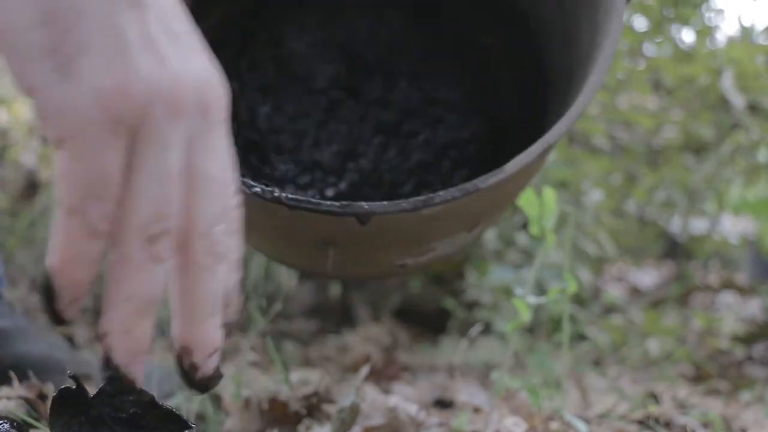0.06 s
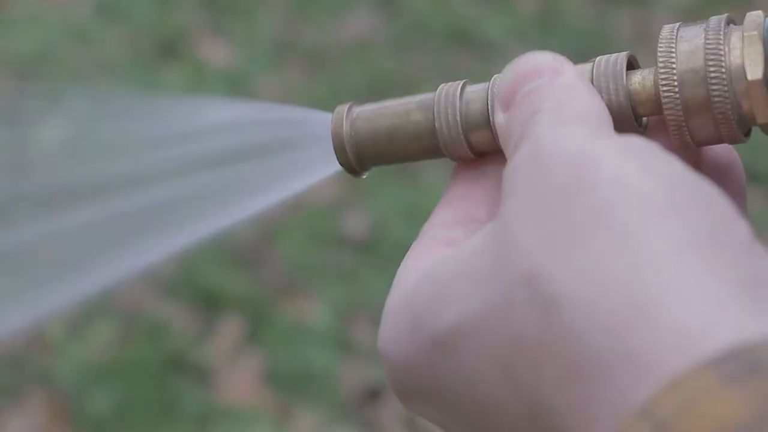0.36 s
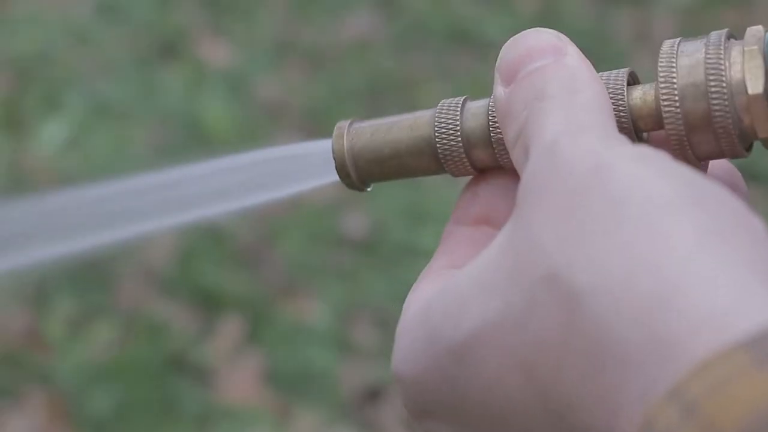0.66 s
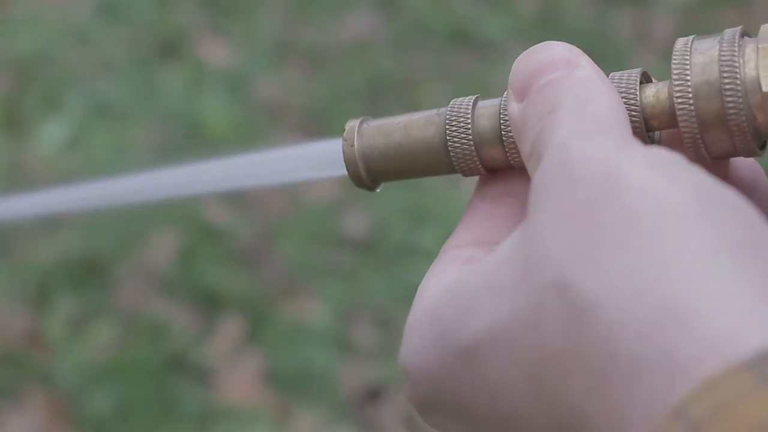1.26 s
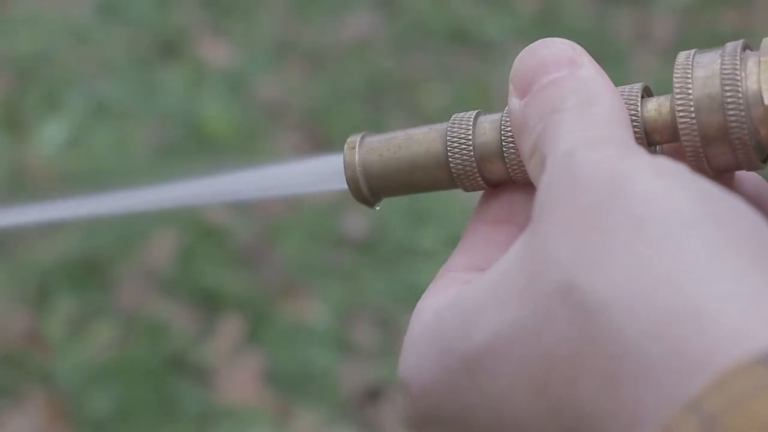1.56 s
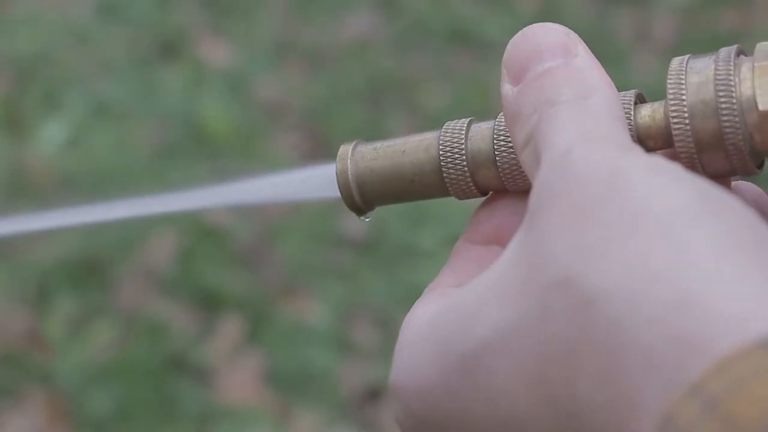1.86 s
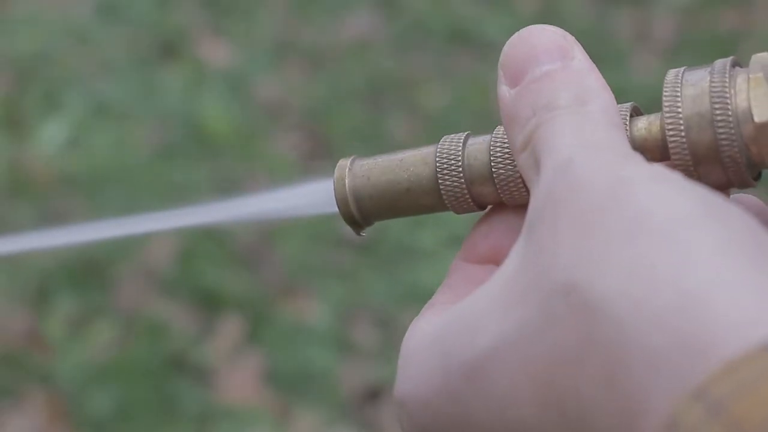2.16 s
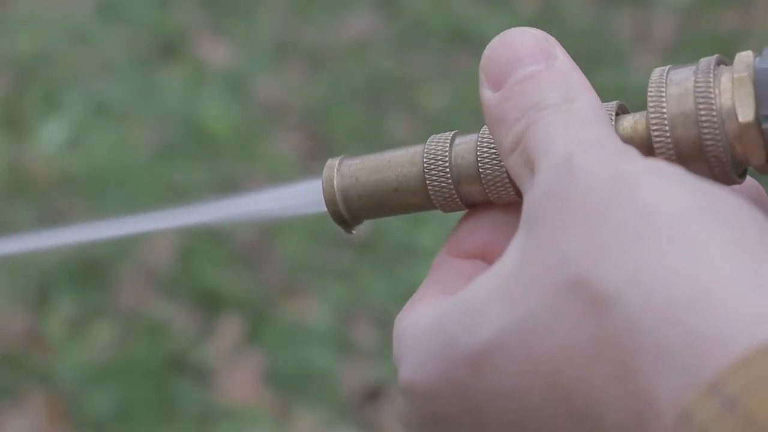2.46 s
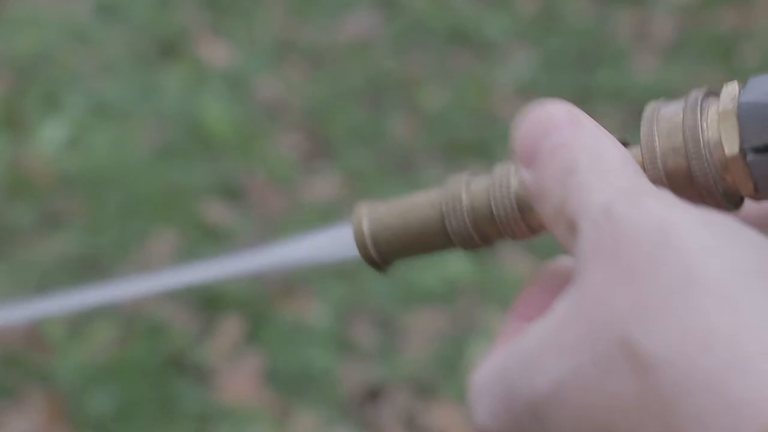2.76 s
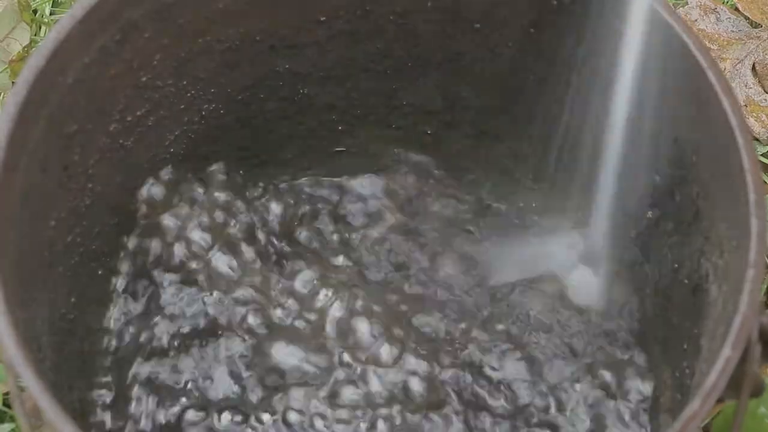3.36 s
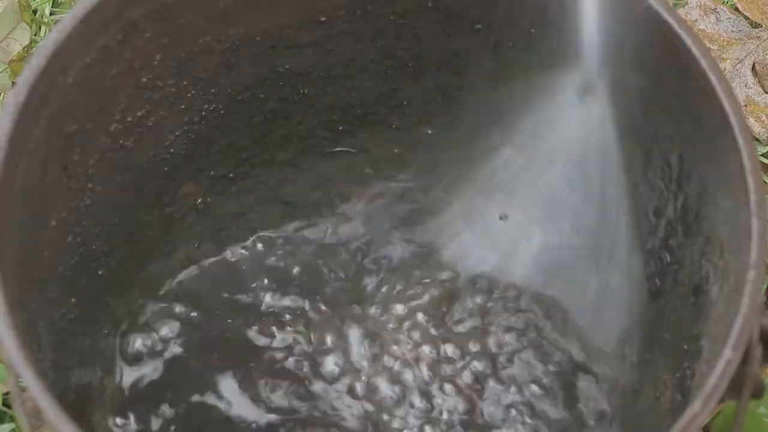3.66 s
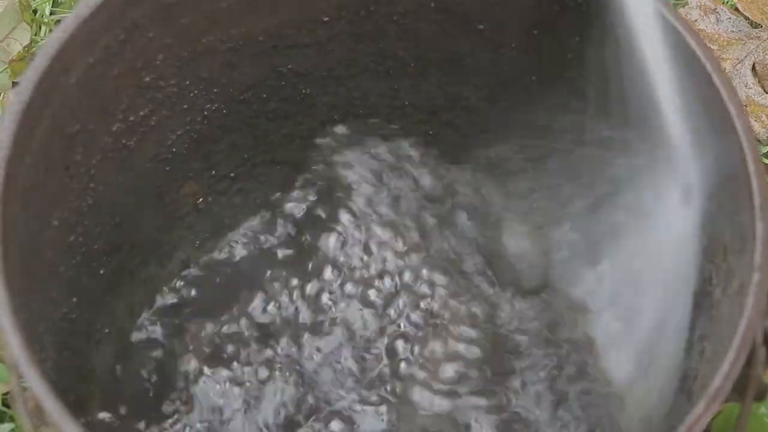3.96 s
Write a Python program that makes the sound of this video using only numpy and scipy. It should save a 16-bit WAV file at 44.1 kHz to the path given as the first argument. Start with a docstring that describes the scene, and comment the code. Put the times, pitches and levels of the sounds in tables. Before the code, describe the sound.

Water hisses from a garden hose nozzle outdoors and patters on grass and dead leaves, after a moment of wind on the microphone. The jet then plunges into a part-filled metal pot, fizzing and gurgling with short ringing tones.

```python
"""Garden hose on grass and into a pot

Wind buffets the microphone and a hand flicks a little water. Then a brass nozzle hisses, its fan
narrowing to a jet, while drops patter on grass and dead leaves. At last the jet plunges into a
part-filled metal pot: a bright fizzing rush, gurgling bubbles and short ringing tones. All in mono."""
import sys
import numpy as np
from scipy import signal
from scipy.io import wavfile

SR = 44100
rng = np.random.default_rng(int(sys.argv[2]) if len(sys.argv) > 2 else 0)


def waveform_to_disk(signal):
    """Save audio, clipped to [-1, 1], as 16-bit WAV at the path in sys.argv[1]."""
    frames = np.transpose(np.atleast_2d(signal))
    scaled = np.clip(frames, -1, 1) * 32767
    samples = np.round(scaled).astype(np.int16)
    wavfile.write(sys.argv[1], SR, samples)


N = 176400
TIME = np.arange(N) / SR
SPRAY_ON_S, LAWN_OFF_S, POT_S = 0.4075, 3.14, 3.143  # the spray starts, leaves the lawn, meets the pot
FAN_UNTIL_S, JET_FROM_S = 1.0, 1.66


def spray():
    """Water lands on the lawn in clumps of drops, coarser as the fan narrows to a jet."""
    narrow = np.clip((TIME - FAN_UNTIL_S) / (JET_FROM_S - FAN_UNTIL_S), 0, 1)
    clumps = rms_one(from_db((0.92 + narrow) * drift(140)))
    drops = blend(impacts(6000, 2.1), impacts(4000, 2.0), narrow)
    water = clumps * (lawn(drops) + hollow()) + nozzle(drops, narrow) + mist()
    return water * fade_in(SPRAY_ON_S, 0.0022) * (1 - fade_in(LAWN_OFF_S, 0.014))


# How loud the bright patter and the dull thud are: (time [s], level [dB])
PATTER_LEVEL = [(.42, -42.5), (.84, -41.5), (.91, -39), (1.08, -41), (1.47, -42), (1.58, -45),
                (1.97, -45.5), (2.03, -43), (2.18, -45.5), (2.28, -42.5), (2.62, -43), (2.68, -45),
                (2.875, -42), (2.93, -53), (2.955, -49.5), (3.13, -43)]
THUD_LEVEL = [(.42, -49.5), (.6, -53.5), (1.22, -53), (1.34, -49), (1.6, -57.5), (2.3, -54.5),
              (3.13, -59.5)]
# Their tone, from low to high: (frequency [Hz], relative level [dB])
PATTER_TONE = [(800, -11), (1150, -1), (1450, -4), (1900, -2), (2270, 0.5), (2800, -.5), (3650, 3.5),
               (4100, -0.5), (4700, -3.5), (5600, -7.5)]
THUD_TONE = [(40, -11.5), (190, -7), (450, -1), (900, -2.5)]

def lawn(drops):
    """The same drops patter and thud on grass and leaves."""
    patter = bands(PATTER_TONE, count=17, patchy_db=1.0, flicker=9.8, clicks=drops, grain=0.41)
    thud = bands(THUD_TONE, count=11, patchy_db=1.4, clicks=drops, grain=0.82)
    return level(PATTER_LEVEL) * patter + level(THUD_LEVEL) * thud


# How loud each part of the rush in the pot is: (time [s], level [dB])
FIZZ_LEVEL = [(3.14, -41), (3.38, -42), (3.46, -39.5), (3.55, -41.5), (3.73, -42.5), (3.85, -38.5),
              (4, -41)]
FROTH_LEVEL = [(3.2, -57), (3.38, -60), (3.47, -47.5), (3.68, -55), (3.9, -49.5), (4, -56)]
CHURN_LEVEL = [(3.15, -41.5), (3.3, -37), (3.38, -41), (3.53, -37.5), (3.62, -41), (4, -40)]
SLOSH_LEVEL = [(3.17, -65.5), (3.3, -48), (3.38, -53.5), (4, -53)]
# The tone of each part: (frequency [Hz], relative level [dB])
FIZZ_TONE = [(3600, 1), (4600, -3), (8500, -6), (13000, -16), (15800, -26)]
FROTH_TONE = [(10000, -2), (12500, 2), (15800, -8)]
CHURN_TONE = [(850, -4), (3300, 5.5), (4000, -0.5)]
SLOSH_TONE = [(200, -12.5), (300, -2), (430, 3), (620, -9), (850, -0.5)]
DRONE_TONE = [(25, -9), (90, -1), (150, -8), (220, -15)]

def pot():
    """The jet tears the water into fizz and froth, churns and sloshes it, and makes the pot drone."""
    bursts = impacts(2300, 1.5)
    fizz = bands(FIZZ_TONE, count=10, patchy_db=1.0, flicker=40, clicks=bursts, grain=0.55)
    froth = bands(FROTH_TONE, count=5, patchy_db=0, clicks=bursts, grain=0.45)
    churn = bands(CHURN_TONE, count=13, patchy_db=1.5, flicker=40, clicks=impacts(1200, 2.4), grain=0.55)
    slosh = bands(SLOSH_TONE, count=9, patchy_db=4, flicker=18)
    drone = bands(DRONE_TONE, count=8, patchy_db=3)
    highs = level(FIZZ_LEVEL) * fizz + level(FROTH_LEVEL) * froth
    body = level(CHURN_LEVEL) * churn + level(SLOSH_LEVEL) * slosh + from_db(-61) * drone
    return (highs + body) * fade_in(POT_S, 0.0026)


# Tones in the pot: (peak time [s], pitch [Hz], level [dB], rise [s], fall [s], roughness [0-1])
POT_RINGS = [(3.144, 2887, -36, 0.0014, 0.065, 0.4), (3.147, 3530, -37.5, .002, 0.036, 0.4),
             (3.247, 3245, -34, 0.0089, 0.015, 0.4), (3.32, 2170, -41, 0.021, 0.029, 0.46),
             (3.43, 2467, -38, 0.012, 0.014, 0.3), (3.456, 3060, -26, 0.0066, .007, 0.56),
             (3.469, 3070, -28.5, 0.0022, .005, 0.3), (3.483, 3080, -32.5, 0.0022, .005, 0.4),
             (3.52, 3080, -35, 0.012, 0.02, 0.9), (3.594, 3110, -34.5, 0.0034, 0.01, 0.5),
             (3.64, 2505, -35, 0.022, 0.066, 0.14), (3.86, 2898, -41, 0.12, 0.04, 0.56),
             (3.914, 2906, -28.5, 0.015, 0.042, 0.33), (3.912, 2470, -26, 0.018, 0.014, 0.3),
             (3.96, 2500, -31.5, 0.018, 0.027, 0.36), (3.998, 2450, -32, 0.0081, .03, 0.3)]

def rings():
    """Clear tones swell and die in the pot, fluttering as the jet keeps shaking them."""
    wander_hz, flutter_per_s = 12, 100
    out = np.zeros(N)
    for peak_s, hz, db, rise, fall, rough in POT_RINGS:
        t = TIME - peak_s
        envelope = np.exp(-np.where(t < 0, (t / rise) ** 2 / 2, t / fall))
        phase = 2 * np.pi * np.cumsum(hz + wander_hz * drift(7.97)) / SR
        shaken = np.sin(phase) + rough * breathy(phase, flutter_per_s)
        out += from_db(db) * envelope * shaken * np.sqrt(2 / (1 + 2 * rough ** 2))
    return out


# Large bubbles in the pot: (time [s], level [dB], starting pitch [Hz])
BUBBLES = [(3.305, -35.5, 427), (3.308, -29, 1440), (3.412, -33.5, 960), (3.527, -25.5, 1270),
           (3.544, -26, 1780), (3.564, -29, 1450), (3.657, -32.5, 946), (3.676, -24, 2210)]

def bubbles():
    """Large bubbles ring briefly and rise in pitch."""
    ring_cycles, pitch_rise, attack_s = 31, 0.041, 0.0009
    out = np.zeros(N)
    for start, db, hz in BUBBLES:
        t = np.maximum(TIME - start, 0)
        age = np.minimum(t * hz / ring_cycles, 2)  # at 1 the ring has faded by 60 dB
        envelope = from_db(db - 60 * age) * (1 - np.exp(-t / attack_s))
        out += envelope * np.sin(2 * np.pi * hz * t * (1 + pitch_rise * age))
    return out


# How dead leaves ring when hit: (pitch [Hz], filter width [Hz], relative level [dB])
LEAF_RESONANCES = [(2300, 400, -0.92), (3800, 1040, -0.1)]
# The strongest clumps of drops: (time [s], level [dB])
SPURTS = [(2.2365, -33), (2.3184, -39), (2.3727, -33.5), (2.472, -35), (2.747, -39), (2.876, -31),
          (2.9494, -36), (3.0362, -46)]

def leaf_taps():
    """The narrow jet throws larger drops that tap on dead leaves, now and then in a clump."""
    taps = from_db(-6) * level(PATTER_LEVEL) * resonances(impacts(330, 2.2), LEAF_RESONANCES)
    taps *= fade_in(JET_FROM_S, 0.22) * (1 - fade_in(LAWN_OFF_S, .01))
    attack_s, fall_s = 0.0005, 0.0036
    clumps = np.zeros(N)
    for start, db in SPURTS:
        t = np.maximum(TIME - start, 0)
        clumps += from_db(db) * (1 - decay(t, attack_s)) * decay(t, fall_s)
    splat = bands(PATTER_TONE, count=9, patchy_db=1.5, clicks=impacts(3000, 1.7), grain=0.7)
    return taps + clumps * splat


# Single drops: (time [s], level [dB], pitch [Hz], ring length [cycles], tick relative to ring [dB])
HEAVY_DROPS = [(.1611, -29, 3000, 24, -1), (.1612, -31, 1250, 12, -12), (.1806, -28.5, 5700, 50, -3),
               (3.1255, -28, 4300, 14, -1), (3.453, -17.5, 3050, 26, -11)]

def heavy_drops():
    """Each heavy drop is a sharp tick of noise and a short ring."""
    tick_band = signal.butter(1, [1100, 5000], "band", fs=SR, output="sos")
    out = np.zeros(N)
    for start, db, hz, cycles, tick_db in HEAVY_DROPS:
        t = np.maximum(TIME - start, 0)
        ring = from_db(-60 * np.minimum(t * hz / cycles, 2)) * np.sin(2 * np.pi * hz * t)
        noise = rms_one(signal.sosfilt(tick_band, rng.standard_normal(N)))
        tick = from_db(tick_db) * decay(t, fall_s=.0008) * noise
        out += (t > 0) * from_db(db) * (ring + tick)
    return out


# How loud the drumming in the soil is: (time [s], level [dB])
HOLLOW_LEVEL = [(1.3, -56), (1.405, -40), (1.52, -44), (1.62, -53), (1.82, -47.5), (1.94, -50),
                (2.08, -55.5)]
# How the hollow rings: (pitch [Hz], filter width [Hz], relative level [dB])
HOLLOW_RESONANCES = [(1123, 330, 4), (2180, 560, -4.5)]

def hollow():
    """The jet drums a hollow in the wet soil with sputtering slaps."""
    sputter = from_db(3.5 * drift(40))
    return passing(HOLLOW_LEVEL) * resonances(sputter * impacts(1500, 0.99), HOLLOW_RESONANCES)


# The sinking note: (time [s], pitch [Hz])
GLIDE_PITCH = [(1.25, 2514), (1.42, 2147.5)]
# How loud it is: (time [s], level [dB])
GLIDE_LEVEL = [(1.22, -56), (1.31, -51), (1.4, -44), (1.44, -58)]

def hollow_glide():
    """A breathy note sinks in pitch as the fan closes into a jet."""
    phase = 2 * np.pi * np.cumsum(np.interp(TIME, *np.transpose(GLIDE_PITCH))) / SR
    return passing(GLIDE_LEVEL) * breathy(phase, flutter_per_s=130)


# How loud the swinging jet is: (time [s], level [dB])
SWEEP_LEVEL = [(2.89, -56), (3.07, -43), (3.128, -43), (3.145, -49)]
# Its tone: (frequency [Hz], relative level [dB])
SWEEP_TONE = [(2800, -3), (7200, -0.5), (11000, -14), (14000, -24)]

def sweep():
    """The jet swings across the leaves towards the pot, and its sizzle swells."""
    sizzle = bands(SWEEP_TONE, count=9, patchy_db=2.0, flicker=28, clicks=impacts(1500, 2.5), grain=.55)
    return passing(SWEEP_LEVEL) * sizzle


# How loud the nozzle is: (time [s], level [dB])
HISS_LEVEL = [(.42, -54), (1.35, -53), (1.55, -55), (2.1, -49), (3.12, -54)]
# Its tone as a fan and as a jet: (frequency [Hz], relative level [dB])
FAN_TONE = [(5500, -3.5), (7500, -11.5), (11000, -17)]
JET_TONE = [(5500, -3.5), (7200, -3.5), (8700, -12), (9600, -9.5), (11000, -11.5)]

def nozzle(drops, narrow):
    """The nozzle hisses, brighter and grainier as the fan becomes a jet."""
    fan = bands(FAN_TONE, count=5, patchy_db=1.5, clicks=drops, grain=.3)
    jet = bands(JET_TONE, count=12, patchy_db=1.7, clicks=drops, grain=0.49)
    return level(HISS_LEVEL) * blend(fan, jet, narrow)


# How loud the mist is: (time [s], level [dB])
MIST_LEVEL = [(.42, -59), (1.58, -61), (1.92, -54.5), (2.2, -53.5), (3.13, -59)]
# Its tone: (frequency [Hz], relative level [dB])
MIST_TONE = [(11000, -1), (12600, 3.5), (14200, 1.5), (15800, -2)]

def mist():
    """The finest droplets of the spray make a very high sizzle."""
    sizzle = bands(MIST_TONE, count=4, patchy_db=1.6, flicker=29, clicks=impacts(4000, 2.4), grain=0.71)
    return level(MIST_LEVEL) * sizzle


# How loud the wind and the flicked water are: (time [s], level [dB])
WIND_LEVEL = [(0, -45.5), (.2, -45), (.27, -43), (.4, -43.5)]
FLICK_LEVEL = [(.14, -75), (.152, -50), (.17, -41), (.189, -57), (.208, -54), (.235, -70)]
# The tone of wind, garden rustle and flick: (frequency [Hz], relative level [dB])
WIND_TONE = [(20, -10), (85, -3), (130, -13.5), (190, -12.5), (250, -28), (400, -38)]
RUSTLE_TONE = [(300, -12), (480, -17.5), (1300, -21), (3500, -18), (6100, -31), (15500, -43)]
FLICK_TONE = [(300, -19), (1100, 0.5), (2060, -4), (3400, 2), (5000, -5), (10100, -13), (15500, -36)]

def wind_and_flick():
    """Wind on the microphone, a faint rustle and a flick of water, until the spray takes over."""
    wind = bands(WIND_TONE, count=8, patchy_db=2.5)
    rustle = bands(RUSTLE_TONE, count=14, patchy_db=1.0, clicks=impacts(600, 1.6), grain=0.18)
    flick = bands(FLICK_TONE, count=10, patchy_db=1.5, flicker=83, clicks=impacts(1500, 3.7), grain=0.43)
    mix = level(WIND_LEVEL) * wind + from_db(-55) * rustle + passing(FLICK_LEVEL) * flick
    return mix * (1 - fade_in(SPRAY_ON_S, 0.0045))


def hand_bump():
    """A soft, low bump as the hand shifts on the nozzle."""
    peak_s, width_s, hz = 0.638, 0.013, 118
    envelope = np.exp(-((TIME - peak_s) / width_s) ** 2 / 2)
    return from_db(-50) * envelope * np.sin(2 * np.pi * hz * TIME)


def from_db(db):
    """Turn decibels into a gain, the number to multiply a sound by."""
    return 10 ** (np.asarray(db) / 20)


def rms_one(x):
    """Scale a signal so its average strength (rms) is 1."""
    return x / np.sqrt(np.mean(x ** 2) + 1e-20)


def level(rows):
    """Gain over time from (time [s], level [dB]) rows."""
    return from_db(np.interp(TIME, *np.transpose(rows)))


def passing(rows):
    """Like level, but silent before the first row and after the last."""
    return level(rows) * (TIME > rows[0][0]) * (TIME < rows[-1][0])


def fade_in(at, length):
    """A ramp from 0 to 1 centred on a moment."""
    return np.clip((TIME - at) / length + .5, 0, 1)


def decay(t, fall_s):
    """Die away from 1 to almost nothing."""
    return np.exp(-np.minimum(t / fall_s, 20))


def blend(first, second, share):
    """Fade between two noises at even strength as share goes from 0 to 1."""
    return np.sqrt(1 - share) * first + np.sqrt(share) * second


def drift(rate):
    """A smooth random wobble of strength 1; a higher rate [Hz] wobbles faster."""
    step, warm_up = 40, 2000  # one random value every 40 samples
    r = np.exp(-2 * np.pi * step * rate / SR)
    noise = rng.standard_normal(N // step + warm_up + 2)
    slow = signal.lfilter([1], [1, -2 * r, r * r], noise)[warm_up:]
    return np.interp(np.arange(N) / step, np.arange(len(slow)), rms_one(slow))


def breathy(phase, flutter_per_s):
    """Noise gathered closely around one pitch."""
    return drift(flutter_per_s) * np.sin(phase) + drift(flutter_per_s) * np.cos(phase)


def impacts(per_s, spread_db):
    """Random clicks, many small and a few large."""
    sizes = from_db(spread_db * np.minimum(rng.exponential(1, N), 4.5))
    signs = np.sign(rng.random(N) - .5)
    hits = rng.random(N) < per_s / SR
    return rms_one(sizes * signs * hits)


def resonate(x, hz, width_hz):
    """A filter that rings at one pitch."""
    r = np.exp(-np.pi * width_hz / SR)
    feedback = [1, -2 * r * np.cos(2 * np.pi * hz / SR), r * r]
    return signal.lfilter(np.array([1, 0, -1]) * (1 - r * r) / 2, feedback, x + 1e-18)


def resonances(x, rows):
    """Ring at several pitches at once, filtering each twice to sharpen it."""
    return rms_one(sum(from_db(db) * resonate(resonate(x, hz, width), hz, width) for hz, width, db in rows))


def bands(tone, count, patchy_db, flicker=10, clicks=0, grain=0):
    """Noise in bands that each wobble by about patchy_db; grain (0-1) is the share that comes in clicks."""
    hz, db = np.transpose(tone)
    edges = np.geomspace(hz[0], hz[-1], count + 1)
    drive = np.sqrt(1 - grain + grain * np.square(clicks))
    out = np.zeros(N)
    for low, high in zip(edges, edges[1:]):
        band_filter = signal.butter(2, [low, high], "band", fs=SR, output="sos")
        band = signal.sosfilt(band_filter, drive * rng.standard_normal(N))
        band_db = np.interp(np.log(low * high) / 2, np.log(hz), db)
        out += band * from_db(band_db + patchy_db * drift(flicker))
    return rms_one(out)


def scene():
    """All sources, the same in both channels."""
    mix = wind_and_flick() + spray() + sweep() + pot() + rings() + bubbles()
    mix += heavy_drops() + hand_bump() + hollow_glide() + leaf_taps()
    return np.tile(mix, (2, 1))


def record(dry):
    """Cut away the very highest treble."""
    cutoff_hz = 15900
    return signal.sosfilt(signal.ellip(12, .1, 90, cutoff_hz, fs=SR, output="sos"), dry)


dry = scene()
out = record(dry)
waveform_to_disk(out)
```